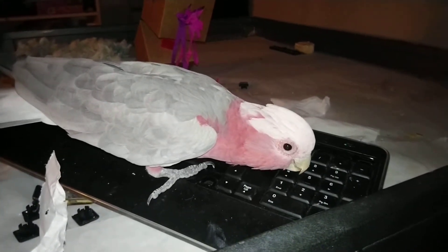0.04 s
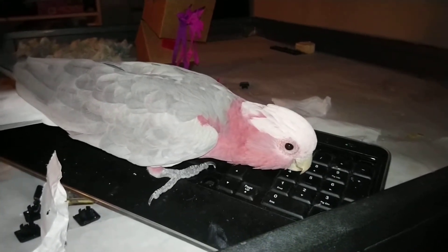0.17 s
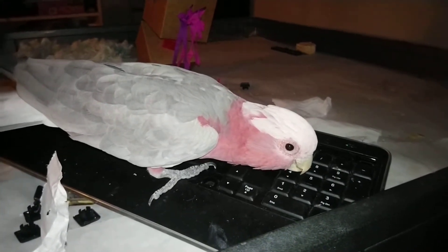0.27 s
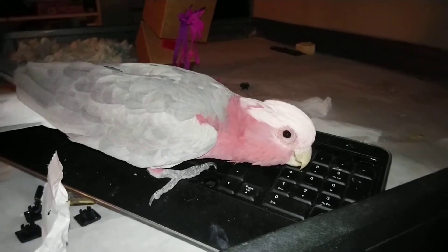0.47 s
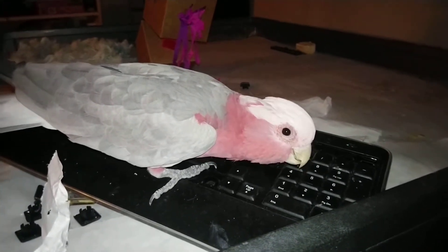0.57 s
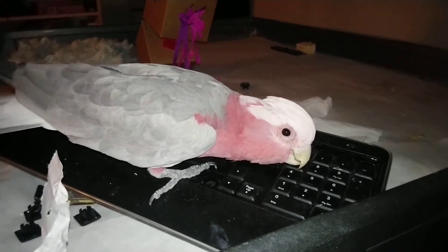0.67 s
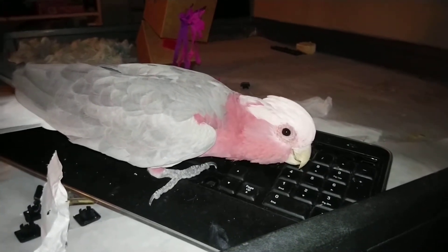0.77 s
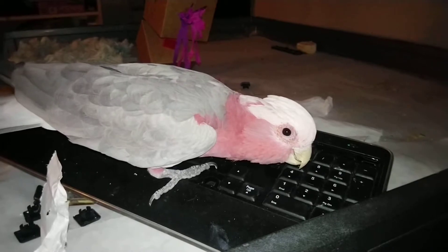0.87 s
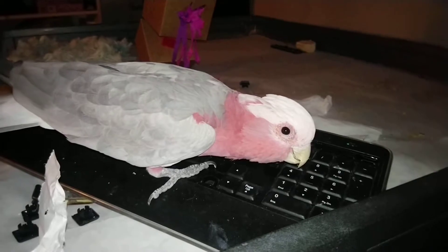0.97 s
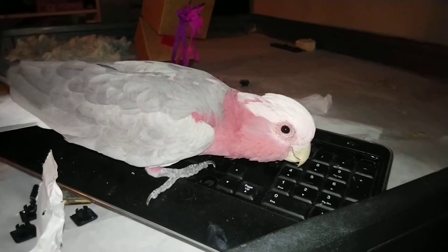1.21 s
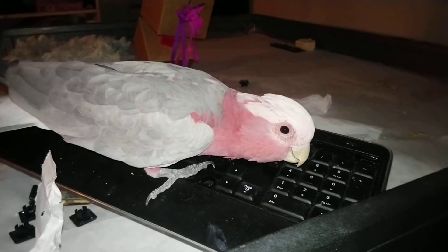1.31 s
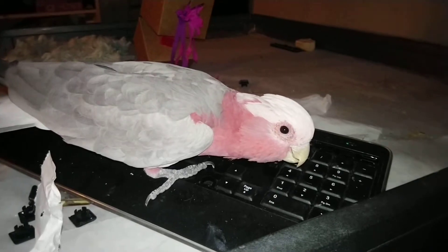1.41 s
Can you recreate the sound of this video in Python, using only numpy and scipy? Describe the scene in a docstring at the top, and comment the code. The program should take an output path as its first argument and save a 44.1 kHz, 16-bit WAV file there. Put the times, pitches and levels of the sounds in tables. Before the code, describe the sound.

A cockatoo hisses close to the microphone in a small room. A soft hiss at about 0.3 seconds swells into a harsh rasp, loudest near 0.6 seconds and gone by 0.8. A second soft hiss comes from about 1.0 to 1.2 seconds, followed by faint, thin puffs of a whistle until 1.4. Steady room noise, a low rumble and a slight hum run underneath.

```python
"""A cockatoo hisses close to a stereo microphone in a small room. Blown air rings in its throat: a soft
hiss swells into a harsh rasp as the beak opens, then a second soft hiss and a faint whistle follow.
Reflections off the desk and the walls drift as the head moves, over room noise, low rumble and hum.
The recorder's gain control ducks under the rasp and recovers slowly."""
import sys
import numpy as np
from scipy import signal
from scipy.fft import rfft, irfft, next_fast_len
from scipy.io import wavfile
from scipy.ndimage import uniform_filter1d, map_coordinates

SR = 44100
rng = np.random.default_rng(int(sys.argv[2]) if len(sys.argv) > 2 else 0)


def store_pcm(level_fs):
    """Save levels as 16-bit WAV."""
    pcm = np.round(np.clip(level_fs, -1, 1) * 32767).astype(np.int16)
    wavfile.write(sys.argv[1], SR, np.atleast_2d(pcm).T)


N = 63945

# The room's steady noise and its rumble. Each row: frequency in Hz, relative density in dB.
ROOM_NOISE_SPECTRUM = [(25, -14), (100, -1), (160, -0.5), (210, -6), (320, 0), (450, -5), (620, -4),
                       (800, -8), (1500, -12.5), (3000, -18.5), (5000, -19), (7000, -24.5), (9000, -31),
                       (11500, -36), (14800, -28), (15600, -47)]
RUMBLE_SPECTRUM = [(20, -53), (35, -54), (50, 2), (62, 0), (80, 2), (100, -20), (150, -20.5), (400, -65)]
# The rumble's swells. Each row: time in seconds, level in dB.
RUMBLE_SWELLS = [(0, -35), (.09, -41), (.22, -31.5), (.33, -41), (.4, -30), (.46, -36), (.51, -28),
                 (.58, -37.5), (.69, -39), (.92, -36), (1.001, -31.5), (1.13, -30), (1.18, -39.5),
                 (1.254, -26.5), (1.31, -43.5), (1.43, -32.5)]
# Background likeness at the two microphone ports. Each row: frequency in Hz, correlation from 0 to 1.
PORT_LIKENESS = [(60, 1), (150, 0.84), (300, 0.89), (600, 0.69), (1200, 0), (4000, 0)]
# Hum in the room. Each row: frequency in Hz, level in dB.
HUM_TONES = [(54, -43), (161.5, -51), (619, -55.5)]

# Soft hisses. Each row: start, attack, hold and release in seconds, level in dB,
# narrowness of the beak from 0 to 1, treble gain in dB.
SOFT_HISSES = [(0.292, 0.051, 0.12, 0.053, -31.5, 0.07, 1.5), (1.027, 0.027, 0.013, 0.11, -31.5, 0.73, -5),
               (1.087, 0.032, 0.025, 0.1, -27.5, 0.45, -13), (1.314, 0.027, 0.047, .06, -50, 0.2, 7)]
# Their throat resonances. Each row: centre and width in Hz, gain in dB with the beak loose, then narrow.
HISS_THROAT = [(900, 225, 5.5, -7.5), (1214, 240, -4.5, 8), (1768, 290, 5, -4), (2200, 230, -9.5, 6),
               (3670, 280, -2, -5), (4320, 330, 1, -6), (4530, 320, -12, 15), (6670, 730, -13.5, -1),
               (9100, 900, -16.5, -17.5)]
# Broad air noise under the resonances, soft hiss and rasp. Each row: frequency in Hz, relative dB.
HISS_AIR_SPECTRUM = [(200, -41), (600, -21), (1200, -11.5), (2700, -7), (5500, -6.5), (7500, -20.5),
                     (10300, -23), (11500, -58), (15000, -30)]
RASP_AIR_SPECTRUM = [(300, -49), (800, -29), (1400, -32), (3000, -15), (7000, -36), (10500, -23),
                     (12000, -34), (13800, -23), (14600, -30), (15600, -30)]
# Air flow of the rasp. Each row: time in seconds, level in dB.
RASP_AIRFLOW = [(.458, -58), (0.463, -19), (.474, -39), (0.477, -15.5), (.494, -17.5), (.499, -11.5),
                (.532, -13.5), (.556, -11), (0.621, -1), (0.641, -8.5), (0.676, -16.5), (.72, -25)]
# The beak during the rasp. Each row: time in seconds, opening from 0 (shut) to 1 (wide).
BEAK_OPENING = [(.48, 0), (.52, 0.12), (.555, 0.64), (.595, 0.91), (.63, 1)]
# Throat resonances of the rasp. Each row: centre in Hz with the beak shut, then wide, width in Hz,
# gain in dB shut, then wide.
RASP_THROAT = [(1100, 1670, 210, -4.5, -7.5), (1610, 1810, 170, -3.5, -3), (2218, 3186, 240, 4, -11.5),
               (3704, 3630, 324, -2, -6.5), (4590, 4950, 330, 5.5, 2.5), (4900, 5413, 284, 2, 1),
               (5970, 6130, 630, -3.5, -7), (7390, 7090, 800, -4, -6), (9250, 9060, 450, -12.5, -12)]
# Puffs of the whistle. Each row: start, attack, hold and release in seconds, level in dB.
WHISTLE_PUFFS = [(1.24, 0.025, 0.028, .04, -58), (1.349, 0.017, .012, 0.051, -51),
                 (1.409, 0.011, 0.0086, 0.03, -49.5)]

# The small room's tail. Each row: frequency in Hz, seconds to fall by 60 dB.
ROOM_DECAY = [(200, 0.31), (1800, 0.34), (5000, 0.38), (9000, 0.33), (15000, 0.27)]
# Colour of the two microphone ports. Each row: frequency in Hz, gain in dB.
LEFT_PORT_COLOUR = [(100, -1), (400, -1.5), (3500, 2), (4150, -5.5), (4800, -5.5), (5500, -2.5), (6100, 0),
                    (6800, 2), (8000, -4), (9200, 1.5), (11000, -4.5), (15000, -6.5)]
RIGHT_PORT_COLOUR = [(100, 1), (400, -1), (3500, 0.5), (4600, 4), (5600, 1.5), (6400, -8.5), (7400, -10.5),
                     (7900, -40), (8400, 0), (8900, -18), (9400, -47), (10000, -14), (11000, 0),
                     (11550, -38), (12300, -13), (15000, -6.5)]


def amp(db):
    """Decibels to gain."""
    return 10 ** (np.asarray(db) / 20)


def unit(x):
    """Scaled to rms 1."""
    return x / np.sqrt(np.mean(x ** 2) + 1e-20)


def along(points, hz):
    """Reads (Hz, value) points along a log frequency axis."""
    f, v = np.transpose(points)
    return np.interp(np.log(hz + 1), np.log(f + 1), v)


def clock():
    """Time of each sample in seconds."""
    return np.arange(N) / SR


def wobble(rate):
    """A smooth random curve, rate knots a second."""
    return map_coordinates(rng.standard_normal(4096), [clock() * rate], mode="wrap")


def swell(start, attack, hold, release):
    """Attack, hold and release as a gain."""
    t = clock() - start
    return np.clip(t / attack, 0, 1) * np.clip(1 - (t - attack - hold) / release, 0, 1)


def filtered(x, response):
    """Filters x by a gain given as a function of Hz."""
    size = next_fast_len(N + SR // 2)
    return irfft(rfft(x, size) * response(np.fft.rfftfreq(size, 1 / SR)), size)[..., :N]


def stereo_noise(spectrum):
    """Steady noise, alike at both microphone ports in the bass."""
    def mid_and_side(hz):
        spread = np.arccos(np.clip(along(PORT_LIKENESS, hz), -1, 1)) / 2
        return amp(along(spectrum, hz)) * [np.cos(spread), np.sin(spread)]
    mid, side = filtered(rng.standard_normal((2, N)), mid_and_side)
    return unit(np.array([mid + side, mid - side]))


def room_tone(noise_db=-40.5):
    """The room behind the bird: steady noise, a swelling low rumble and a slightly unsteady hum."""
    hum = sum(amp(db) * unit(np.sin(2 * np.pi * hz * clock() + .5 * wobble(7.94)))
              for hz, db in HUM_TONES)
    rumble = stereo_noise(RUMBLE_SPECTRUM)
    rumble_power = np.abs(uniform_filter1d(np.mean(rumble ** 2, axis=0), size=3000))
    even_rumble = rumble / np.sqrt(rumble_power + 1e-6)
    swells = amp(np.interp(clock(), *np.transpose(RUMBLE_SWELLS)))
    return amp(noise_db) * stereo_noise(ROOM_NOISE_SPECTRUM) + swells * even_rumble + hum


def turbulence(flutter_db=1.5, flutter_hz=328.4):
    """Air noise that comes in quick uneven spurts."""
    return unit(rng.standard_normal(N) * amp(flutter_db * np.clip(wobble(flutter_hz), -2, 1.5)))


def resonance(f, hz, width, db):
    """Power response of a steep-sided throat resonance."""
    return amp(db) ** 2 / (1 + ((f * f - hz * hz) / (np.sqrt(2) * (f + 1) * width)) ** 2) ** 2


def soft_hisses(treble_above_hz=8000):
    """Gently blown air rings in the throat; a narrow beak sharpens it."""
    hisses = np.zeros(N)
    for *shape, level_db, narrowness, treble_db in SOFT_HISSES:
        def throat(f):
            ringing = sum(resonance(f, hz, width, loose_db + narrowness * (narrow_db - loose_db))
                          for hz, width, loose_db, narrow_db in HISS_THROAT)
            power = amp(along(HISS_AIR_SPECTRUM, f)) ** 2 + ringing
            return np.sqrt(power) * amp(treble_db * (f > treble_above_hz))
        hisses += amp(level_db) * swell(*shape) * unit(filtered(turbulence(), throat))
    return hisses


def rasp(surge_db=0.88, surge_hz=129.63):
    """Hard-blown air through throat resonances, most of which rise as the beak opens."""
    f, t, spectra = signal.stft(turbulence(), SR, nperseg=512, noverlap=384)
    f = f[:, None]
    opening = np.interp(t, *np.transpose(BEAK_OPENING))
    power = amp(along(RASP_AIR_SPECTRUM, f)) ** 2
    for shut_hz, wide_hz, width, shut_db, wide_db in RASP_THROAT:
        hz = shut_hz + opening * (wide_hz - shut_hz)
        db = shut_db + opening * (wide_db - shut_db)
        power = power + resonance(f, hz, width, db)
    throat = np.sqrt(power / power.mean(0))  # colour only: the air flow sets the level
    air = signal.istft(spectra * throat, nperseg=512, noverlap=384)[1][:N]
    flow_db = np.interp(clock(), *np.transpose(RASP_AIRFLOW), left=-120, right=-120)
    return unit(air) * amp(flow_db + surge_db * wobble(surge_hz))


def whistle(pitch_hz=2234, waver_hz=20, flutter_db=2):
    """A thin, breathy, wavering tone in short puffs."""
    tone = np.sin(2 * np.pi * np.cumsum(pitch_hz + waver_hz * wobble(150)) / SR)
    puffs = sum(amp(db) * swell(*shape) for *shape, db in WHISTLE_PUFFS)
    return unit(tone * amp(flutter_db * wobble(180))) * puffs


def room(x, tail_db=1.5, desk_db=4, desk_t60_s=0.041):
    """What reaches the microphone: direct sound, quick reflections off the desk and the room's tail."""
    hz, t, spectra = signal.stft(rng.standard_normal((2, SR // 2)), SR, nperseg=256)
    decay = amp(-60 * t / along(ROOM_DECAY, hz)[:, None])
    tail = signal.istft(spectra * decay, SR, nperseg=256)[1]
    desk = rng.standard_normal(tail.shape) * amp(-60 * np.arange(tail.shape[1]) / SR / desk_t60_s)
    unit_energy = lambda h: h / np.linalg.norm(h, axis=1, keepdims=True)
    response = amp(tail_db) * unit_energy(tail) + amp(desk_db) * unit_energy(desk)
    response[0, 14] += 1  # the direct sound reaches the left port 14 samples after the right
    response[1, 0] += 1
    return signal.fftconvolve(x[None], unit_energy(response), axes=1)[:, :N]


def scene(head_move_s=0.1195, whistle_send_db=-9):
    """The bird close by, its reflections drifting as its head moves; a drier whistle; room tone."""
    peep = whistle()
    bird = rasp() + soft_hisses() + amp(whistle_send_db) * peep
    pose = clock() / head_move_s  # each pose of the head has its own reflections
    crossfades = [np.sqrt(np.clip(1 - np.abs(pose - k), 0, 1)) for k in range(int(pose[-1]) + 2)]
    return room_tone() + peep + sum(room(bird * fade) for fade in crossfades)


def gain_control(x, threshold_db=-17, attack_s=0.023, release_s=0.56, hop=64):
    """The recorder turns down quickly above the threshold and comes back slowly."""
    power = np.abs(uniform_filter1d(np.mean(x ** 2, axis=0), size=441))[::hop]
    excess_db = np.maximum(10 * np.log10(power + 1e-12) - threshold_db, 0)
    cuts_db = [0]
    for over in excess_db:
        lag_s = attack_s if over > cuts_db[-1] else release_s
        cuts_db.append(cuts_db[-1] + (over - cuts_db[-1]) * (1 - np.exp(-hop / SR / lag_s)))
    return x * amp(-np.interp(np.arange(N), np.arange(len(cuts_db)) * hop, cuts_db))


def record(dry, ceiling=.62, top_hz=15500):
    """Through the microphone's ports into the recorder: gain control, a soft ceiling, a band limit."""
    ports = lambda hz: amp([along(LEFT_PORT_COLOUR, hz), along(RIGHT_PORT_COLOUR, hz)])
    ducked = gain_control(filtered(dry, ports))
    limited = ducked / (1 + np.abs(ducked / ceiling) ** 8) ** (1 / 8)
    return filtered(limited, lambda hz: hz < top_hz)


dry = scene()
out = record(dry)
store_pcm(out)
```